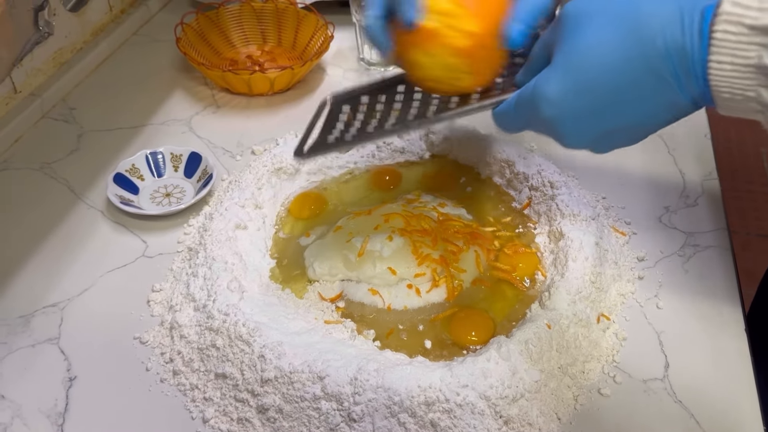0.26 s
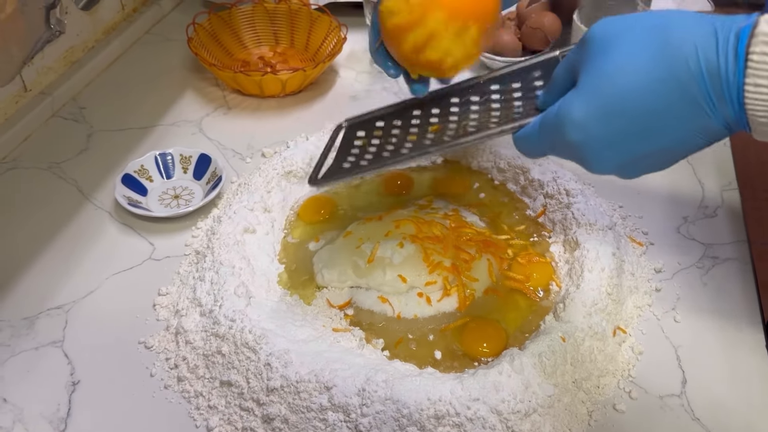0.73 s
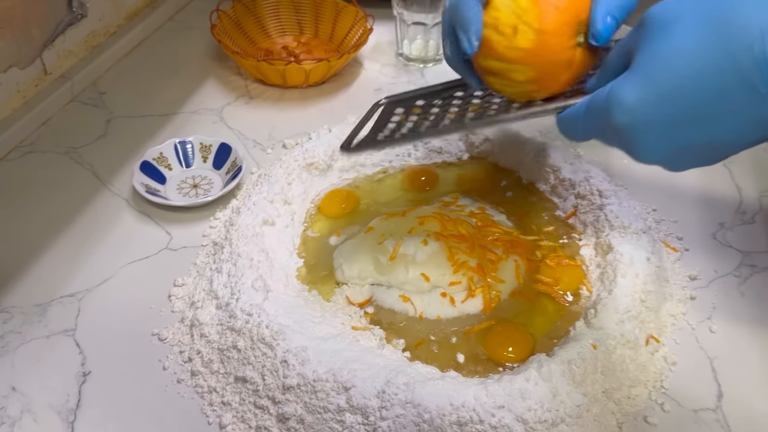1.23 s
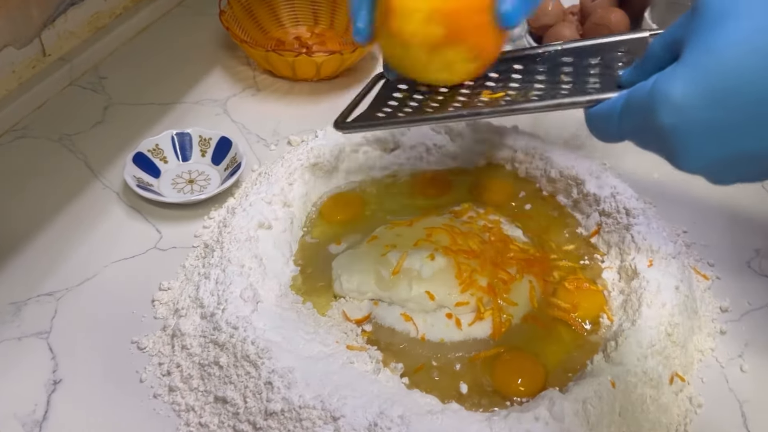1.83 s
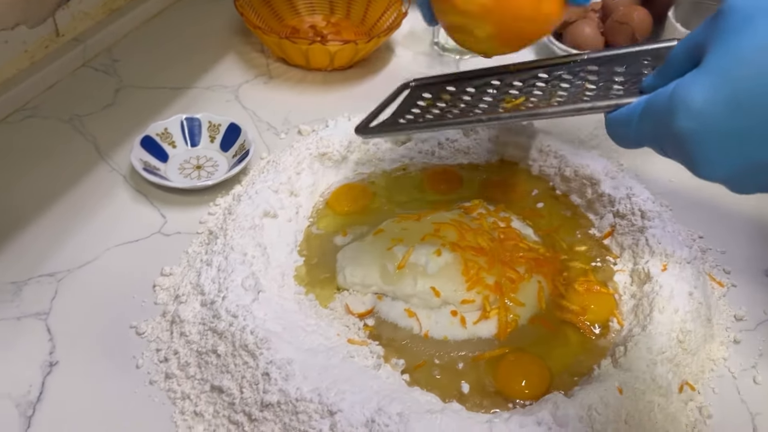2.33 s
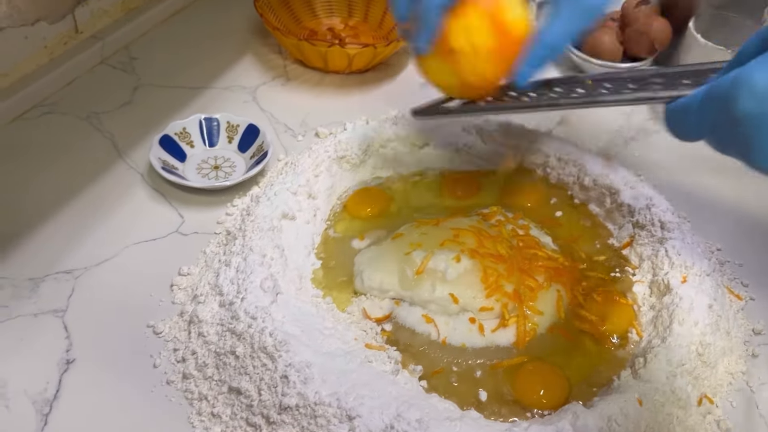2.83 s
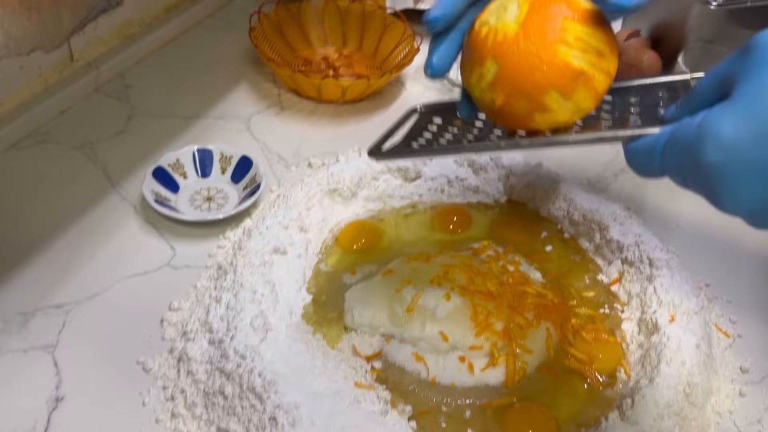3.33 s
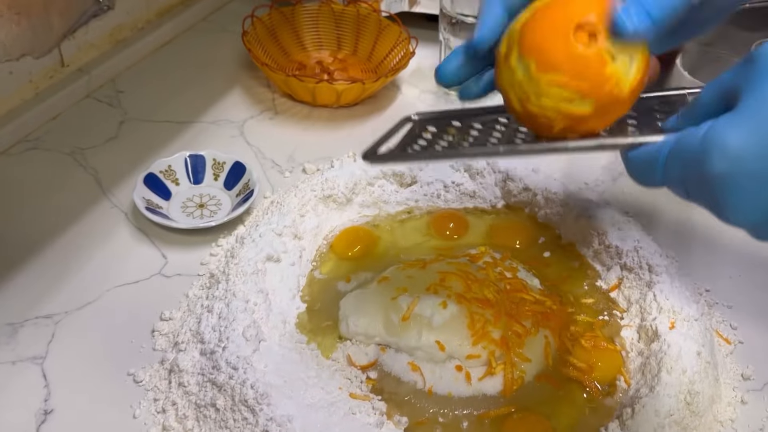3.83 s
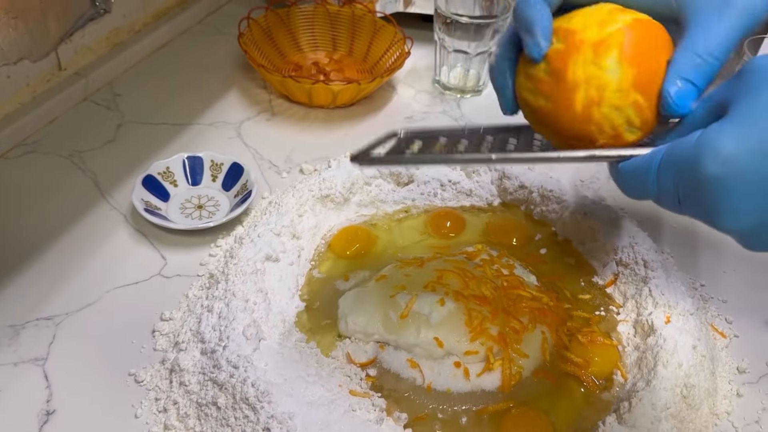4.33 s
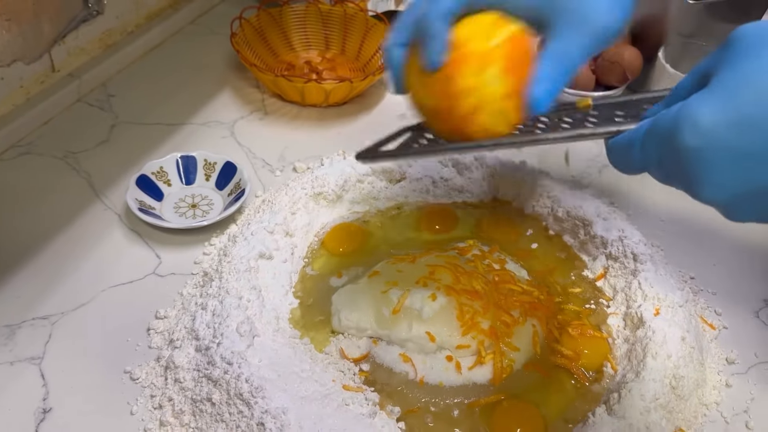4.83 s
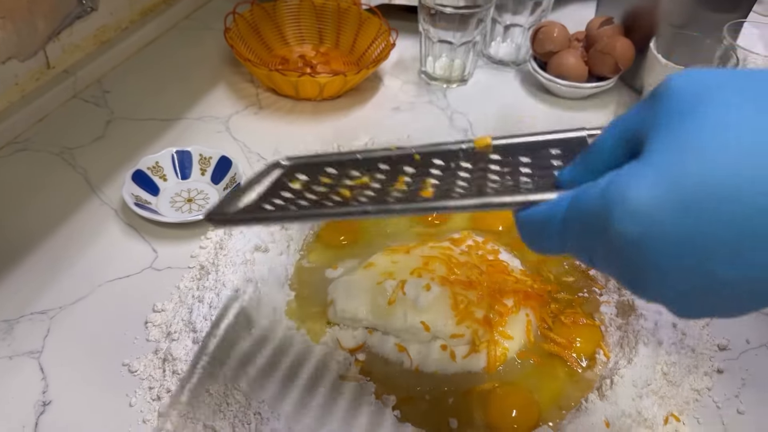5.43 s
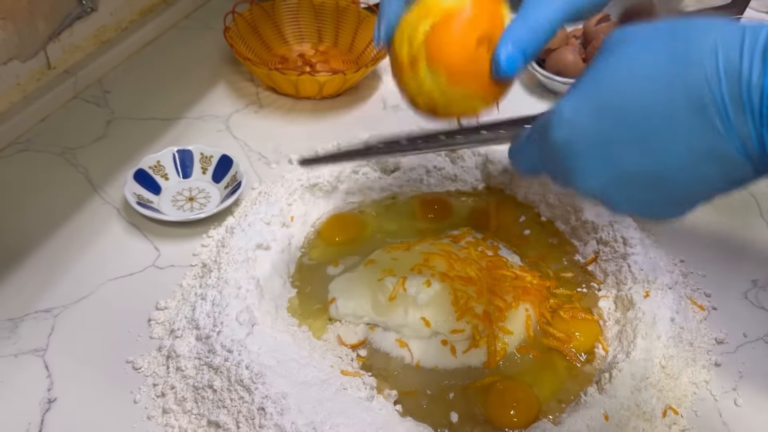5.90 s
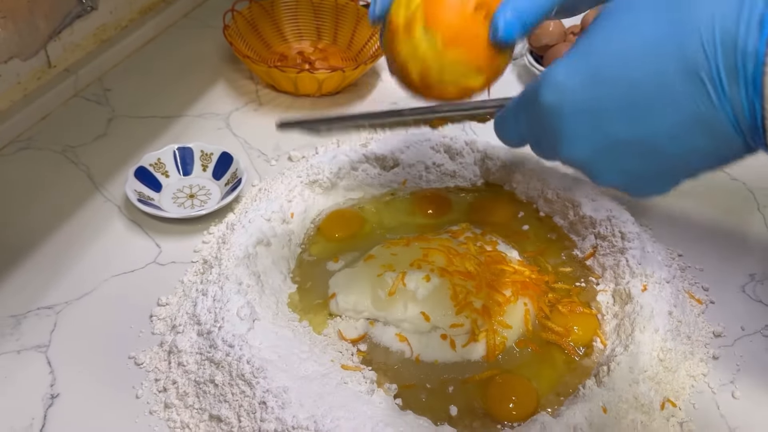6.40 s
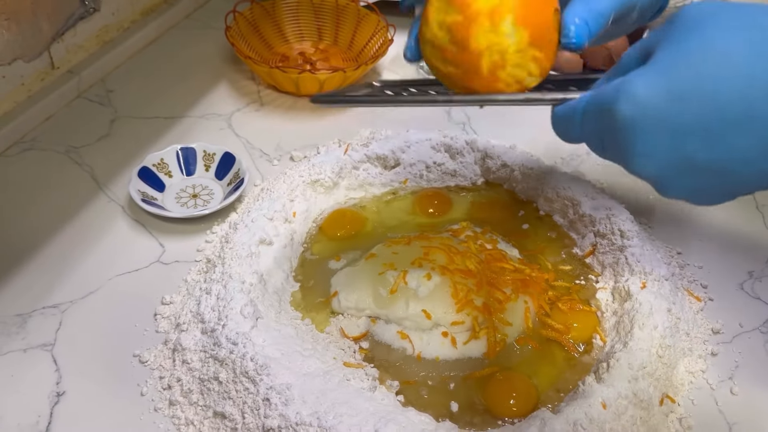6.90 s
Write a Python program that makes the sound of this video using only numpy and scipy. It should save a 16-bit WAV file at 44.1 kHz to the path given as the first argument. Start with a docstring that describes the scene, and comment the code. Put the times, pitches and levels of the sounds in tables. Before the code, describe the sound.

Close up in a small kitchen, an orange is rubbed over a flat steel grater in short, uneven, gritty rasps that ring the plate. Thin ticks and faint slides fill the gaps. Later three hard knocks rattle the grater to shake off zest. A steady low appliance hum with soft hiss runs throughout, and the handheld phone adds dull, low bumps.

```python
"""Zesting an orange

Short rasps of peel on a flat steel grater, close to a phone in a small kitchen: noisy bursts ring the plate.
Light touches and slides tick thinly between them; at the end three knocks shake the zest off the plate.
An appliance hums underneath as steady tones over rumble and hiss.
The hand holding the phone makes dull bumps: short low tones with a scuff of noise."""
import sys
import numpy as np
from scipy import signal
from scipy.fft import rfft, irfft, next_fast_len
from scipy.io import wavfile
from scipy.ndimage import uniform_filter1d, map_coordinates

SR = 44100
rng = np.random.default_rng(int(sys.argv[2]) if len(sys.argv) > 2 else 0)


def master_out(mix):
    """Clip the mix to full scale and print it as 16-bit PCM to the path in sys.argv[1]."""
    frames = np.transpose(np.atleast_2d(mix))
    ceiling = np.clip(frames, -1, 1)
    pcm = np.round(ceiling * 32767).astype(np.int16)
    wavfile.write(sys.argv[1], SR, pcm)


N = 315491  # length in samples


def amp(db):
    """Turn decibels into a gain."""
    return 10 ** (np.asarray(db) / 20)


def unit(x):
    """Scale x to rms 1."""
    return x / np.sqrt(np.mean(x ** 2) + 1e-20)


def along(points, hz):
    """Read a curve of (pitch_hz, value) points on a log pitch axis."""
    point_hz, values = np.transpose(points)
    return np.interp(np.log(hz + 1), np.log(point_hz + 1), values)


def wobble(rate):
    """Draw a smooth random curve with rate knots a second."""
    knots = rng.standard_normal(int(N * rate / SR) + 4)
    return map_coordinates(knots, [np.arange(N) * rate / SR])


def filtered(x, response):
    """Filter x by a response, which may be complex, given as a function of frequency."""
    size = next_fast_len(N + SR // 2)  # spare room for ringing
    hz = np.fft.rfftfreq(size, 1 / SR)
    return irfft(rfft(x, size) * response(hz), size)[..., :N]


def tilt(x, corner_hz):
    """Split x into what lies below and above a corner."""
    low = filtered(x, lambda hz: 1 / (1 + (hz / corner_hz) ** 8))
    return low, x - low


def band(x, centre_hz, width_hz):
    """Keep the part of x around a centre frequency."""
    return filtered(x, lambda hz: 1 / (1 + ((hz - centre_hz) / (width_hz / 2)) ** 4))


def causal(gain):
    """Give this gain its minimum-phase response, which rings only after a blow."""
    cepstrum = irfft(np.log(np.maximum(gain, 1e-6)))
    half = len(cepstrum) // 2
    folded = np.r_[cepstrum[0], 2 * cepstrum[1:half], np.zeros(half)]
    return np.exp(rfft(folded))


def spread(pair, alike):
    """Mix two unrelated signals into a left and right of the given likeness."""
    def mid_and_side(hz):
        turn = np.arccos(np.clip(along(alike, hz), -1, 1)) / 2
        return np.array([np.cos(turn), np.sin(turn)])
    mid, side = filtered(pair, mid_and_side)
    return np.array([mid + side, mid - side])


def blow(start_s, t60, attack):
    """Shape a blow: a quick rise (attack, s), then a decay of 60 dB in t60 seconds."""
    out = np.zeros(N + SR)
    first = max(round(start_s * SR), 0)
    t = np.arange(SR // 2) / SR
    decay = np.exp(-np.log(1000) * t / t60)
    out[first:first + len(t)] = decay * (1 - np.exp(-t / attack))
    return out[:N]


def snaps(rate, scatter_db):
    """Make two streams of tiny ruptures of uneven size, about rate a second, rms 1."""
    hit = rng.random((2, N)) < rate / SR
    size = amp(scatter_db * rng.standard_normal((2, N)))
    return unit(hit * rng.choice([-1, 1], (2, N)) * size)


# colour of the kitchen air's noise: pitch_hz, level_db (relative, per Hz)
ROOM_COLOUR = [(20, -30), (42, -7.5), (75, 0), (130, -2), (220, -9.5), (400, -16.5), (700, -19),
               (1300, -26.5), (2000, -32), (3500, -43), (8000, -47.5), (10000, -47), (11700, -64),
               (15300, -52.5)]
# how alike the air noise is at left and right: pitch_hz, coherence (1 = same), before the phone
ROOM_ALIKE = [(70, 1), (140, 0.97), (300, 0.47), (600, 0.33), (1300, 0.037), (3500, 0.22), (7500, 0.47)]
# the appliance's steady tones: pitch_hz, level_db (rms, before the phone)
HUM = [(63, -51), (71.3, -43.5), (100, -34.5), (113, -46), (292, -69.5), (1707, -72), (1755, -66.5),
       (1852, -63), (3558, -75), (4683, -82), (5410, -76)]


def kitchen():
    """The appliance's hum and faint whine over an uneven rumble and a smooth hiss."""
    t = np.arange(N) / SR
    noise = spread(rng.standard_normal((2, N)), ROOM_ALIKE)
    air = unit(filtered(noise, lambda hz: amp(along(ROOM_COLOUR, hz))))
    rumble, hiss = tilt(air, corner_hz=295)
    tones = np.zeros(N)
    for pitch_hz, level_db in HUM:
        wandering_t = t + 0.00013 * wobble(7)  # pitch is not quite steady
        turns = pitch_hz * wandering_t + rng.random()
        tones += amp(level_db) * np.sqrt(2) * np.sin(2 * np.pi * turns)
    return amp(-33.5 + 2.2 * wobble(25)) * rumble + amp(-33.0) * hiss + tones


# the strongest dull bumps of the hand on the phone: start_s, level_db (before the mix below), pitch_hz
BUMPS = [(.516, -24, 193), (.558, -19, 136), (1.363, -20, 161), (1.455, -22, 199), (1.664, -19, 124),
         (1.82, -22.5, 147), (1.94, -22.5, 203), (2.269, -24.5, 198), (2.858, -18.5, 163),
         (2.921, -24.5, 214.5), (3.225, -24, 159), (3.384, -25, 144), (4.7, -20.5, 121), (5.045, -19, 197),
         (5.118, -21, 205), (5.682, -24.5, 207), (6.136, -17, 172), (6.349, -18.5, 203),
         (6.992, -24.5, 178)]
# colour of the hand's scuffing: pitch_hz, level_db (relative, per Hz)
SCUFF_COLOUR = [(60, -39), (130, -0.5), (220, 1), (340, -9), (520, -22), (900, -73)]
BUMP_T60_S = 0.094
# lighter bumps at random times, one in each equal slice of the scene
NUDGE_COUNT, NUDGE_DB, NUDGE_LOW_HZ, NUDGE_HIGH_HZ = 10, -28, 117, 215


def bumping():
    """The phone's body answers each shift of the hand with a few low cycles and a scuff; the grip fidgets."""
    t = np.arange(N) / SR
    bumps = list(BUMPS)
    for slot, (when, height) in enumerate(rng.random((NUDGE_COUNT, 2))):
        start_s = (slot + when) * N / SR / NUDGE_COUNT
        pitch_hz = NUDGE_LOW_HZ + height * (NUDGE_HIGH_HZ - NUDGE_LOW_HZ)
        bumps.append((start_s, NUDGE_DB, pitch_hz))
    pushes, thumps = np.zeros(N), np.zeros(N)
    for start_s, level_db, pitch_hz in bumps:
        push = amp(level_db) * blow(start_s, BUMP_T60_S, attack=0.0033)
        pushes += push
        thumps += push * np.sin(2 * np.pi * pitch_hz * (t - start_s))
    scuff = unit(filtered(rng.standard_normal(N), lambda hz: amp(along(SCUFF_COLOUR, hz))))
    fidget = amp(-44.5) * unit(amp(6.3 * wobble(35)))
    return amp(3.5) * thumps + scuff * (amp(-7.5) * pushes + fidget)


# how long the room's echo takes to die by 60 dB: pitch_hz, t60_s
WALLS = [(200, 0.23), (2000, 0.22), (7000, 0.18), (15000, 0.14)]


def walls(x):
    """The room's short answer: decaying noise that dies faster in the treble."""
    noise = rng.standard_normal((2, SR // 2))
    hz, t, z = signal.stft(noise, SR, nperseg=256)
    decay = np.exp(-np.log(1000) * t / along(WALLS, hz)[:, None])
    tail = signal.istft(z * decay, SR, nperseg=256)[1]
    tail = np.pad(tail / np.linalg.norm(tail[0]), ((0, 0), (SR // 200, 0)))  # starts 5 ms late
    return signal.fftconvolve(x, tail, axes=1)[:, :N]


# resonances of the grater plate: pitch_hz, width_hz, rubbed_db, knocked_db (both relative)
PLATE = [(614, 69, 3.5, 7.5), (942, 30, 7.5, 11), (1247, 59, 3, 3), (1497, 36, 2, -9), (1898, 54, 4, -5),
         (2196, 64, 4.5, 2.5), (2970, 34, -13, 3), (3150, 37, 1, -4), (3690, 70, -1.5, -6),
         (4530, 80, -1, -4), (5270, 31, -19, 4), (5670, 45, -14, -3), (7040, 110, -2.5, 1.5)]
# how alike the grater is at left and right: pitch_hz, coherence (1 = same), before the phone
GRATER_ALIKE = [(300, 0.98), (700, 0.62), (1700, 0.25), (3500, 0.69), (5500, 0.41), (7200, 0.73)]
RUBBED, KNOCKED = 2, 3  # level columns of PLATE


def plate(force, spectrum, ring, column):
    """A force on the grater, heard through its broad colour and its narrow resonances."""
    def response(hz):
        modes = np.zeros(len(hz))
        for mode in PLATE:
            detuning = 2 * (hz - mode[0]) / mode[1]
            modes += amp(mode[column]) ** 2 / (1 + detuning ** 2)
        return causal(unit(amp(along(spectrum, hz)) * np.sqrt(1 + ring ** 2 * modes)))
    return spread(filtered(force, response), GRATER_ALIKE)


# knocks on the grater: start_s, level_db (before the plate), rebound_after_s, rebound_db (relative)
KNOCKS = [(5.8166, -28.5, 0.0041, -9.5), (6.075, -30, 0.0063, -8.5), (6.3202, -25.5, 0.009, -13)]
# broad colour of a knock: pitch_hz, level_db (relative, per Hz)
KNOCK_COLOUR = [(150, -13), (600, -7), (850, -11.5), (1350, -2), (2400, -11), (3100, -12), (4100, -13),
                (5500, -13.5), (7000, -8), (8500, -15.5), (10000, -14.5), (12200, -26), (15000, -21.5)]


def knocking():
    """Each knock starts with a hard crack and rattles the hand-damped plate, with a quick rebound."""
    force = np.zeros(N)
    for start_s, level_db, rebound_after_s, rebound_db in KNOCKS:
        crack = amp(1.5) * blow(start_s, t60=0.016, attack=0.00048)
        rattle = blow(start_s, t60=0.051, attack=0.0009)
        rebound = amp(rebound_db) * blow(start_s + rebound_after_s, t60=0.069, attack=0.00056)
        force += amp(level_db) * (crack + rattle + rebound)
    return amp(2.5) * plate(force * rng.standard_normal((2, N)), KNOCK_COLOUR, ring=1.0, column=KNOCKED)


# a firm touch damps itself sooner: its t60, its level, and the drop in level that doubles t60
TOUCH_T60_S, FIRM_DB, DOUBLING_DB = 0.079, -37, 22


def touch(start_s, level_db):
    """Envelope of the peel meeting the teeth; light touches linger."""
    t60_s = TOUCH_T60_S * 2 ** ((FIRM_DB - level_db) / DOUBLING_DB)
    return amp(level_db) * blow(start_s, t60_s, attack=0.00038)


# cutting strokes, also played by grating(): start_s, bite_s, drag_s, level_db (before the plate),
# flex_db (relative, before a common cut), scrape_db (relative)
STROKES = [(-.012, .016, 0.057, -34, 4, -1), (.318, 0.065, 0.046, -36, 5, -1),
           (1.248, 0.031, 0.065, -34.5, 2.5, -1.5), (1.58, 0.05, .048, -33.5, 4, 2.5),
           (2.717, 0.042, 0.053, -37, 1.5, 0.5), (4.39, 0.041, 0.064, -36, -1.5, 2),
           (4.76, 0.029, 0.064, -37.5, 0, 2.5), (5.085, .028, 0.011, -37.5, 1, 1)]
# the peel touches the teeth: start_s, level_db (before the plate)
TOUCHES = [(.243, -55), (.323, -46), (1.214, -47.5), (1.364, -40.5), (1.545, -55), (1.58, -38),
           (3.037, -50), (3.527, -42.5), (3.546, -52), (3.999, -53.5), (4.345, -45.5), (4.361, -43),
           (4.405, -38), (4.661, -49), (4.741, -39), (4.756, -47), (5.027, -54), (5.086, -46)]
# the peel slides lightly without cutting: middle_s, half_length_s, level_db (before the plate)
GLIDES = [(3.0, 0.18, -59.5), (3.804, .08, -59)]
# the sliding peel's faint squeak: pitch_hz, width_hz, gain_db (on that band of the slide)
GLIDE_SQUEAK = (4320, 270, 2.6)
# broad colour of rubbing, also used by grating(): pitch_hz, level_db (relative, per Hz)
RASP_COLOUR = [(200, -13), (550, -6.5), (1000, -8), (1450, -1), (2000, -3.5), (2700, -6), (4200, -8.5),
               (5600, -13.5), (7200, -9.5), (9600, -6), (12000, -14), (14200, -7.5), (15300, -13)]
# the peel snags just before the deepest bite, at a level relative to its stroke
SNAG_LEAD_S, SNAG_DB = 0.0044, -10
GLIDE_FADE_DB = 9  # drop at half length from the middle


def brushing():
    """Touches, snags and glides only tick the tips of the teeth, so they sound thin."""
    t = np.arange(N) / SR
    meetings = list(TOUCHES)
    for start_s, bite_s, _, level_db, *_ in STROKES:
        meetings.append((start_s + bite_s - SNAG_LEAD_S, level_db + SNAG_DB))
    touches = snaps(rate=4000, scatter_db=3.5) * sum(touch(s, db) for s, db in meetings)
    sliding = np.zeros(N)
    for middle_s, half_s, level_db in GLIDES:
        sliding += amp(level_db - GLIDE_FADE_DB * ((t - middle_s) / half_s) ** 2)
    glides = snaps(rate=3000, scatter_db=0) * sliding
    squeak_hz, width_hz, squeak_db = GLIDE_SQUEAK
    squeak = amp(squeak_db) * band(glides, squeak_hz, width_hz)
    flex, rasp = tilt(touches + glides + squeak, corner_hz=2350)
    return plate(amp(7) * rasp + amp(-2) * flex, RASP_COLOUR, ring=2.3, column=RUBBED)


# a stroke swells as the teeth bite in, sags while the peel drags, and dies as the fruit lifts
CONTACT_S, BITE_DB, SAG_DB_PER_S, LIFT_DB_PER_S = .002, 15.5, 83, 460


def stroke(start_s, bite_s, drag_s):
    """Envelope of one stroke, top 1: bite in, drag, lift off."""
    t = np.arange(N) / SR - start_s
    swell_db = BITE_DB * np.minimum(t / bite_s - 1, 0)
    sag_db = SAG_DB_PER_S * np.clip(t - bite_s, 0, drag_s)
    lift_db = LIFT_DB_PER_S * np.maximum(t - bite_s - drag_s, 0)
    return amp(swell_db - sag_db - lift_db) * np.clip(t / CONTACT_S, 0, 1)


def shifting(x, depth_db):
    """The fruit damps the plate at a moving spot, so narrow bands of sound come and go."""
    z = signal.stft(x, nperseg=1024)[2]
    field = rng.standard_normal(z.shape[1:])
    field = uniform_filter1d(field, size=3, axis=0)  # smooth over pitch
    field = uniform_filter1d(field, size=5, axis=1)  # smooth over time
    gain = unit(amp(depth_db * unit(field)))
    return signal.istft(z * gain, nperseg=1024)[1][:, :N]


def grating():
    """Teeth burst the peel's cells in dense clumps; at the height of a stroke the plate flexes most."""
    # rows of teeth, and single teeth, catch and let go
    catching = unit(amp(1.0 * wobble(90) + 0.94 * wobble(320)))
    ruptures = snaps(rate=4000, scatter_db=3)
    tearing = unit(ruptures + .5 * rng.standard_normal((2, N))) * catching
    flex = band(tearing, centre_hz=1800, width_hz=1500)
    scrape = band(tearing, centre_hz=4550, width_hz=900)
    force = np.zeros((2, N))
    for start_s, bite_s, drag_s, level_db, flex_db, scrape_db in STROKES:
        push = stroke(start_s, bite_s, drag_s)
        bending = amp(flex_db - 2.5) * push ** 0.16
        colour = tearing + (bending - 1) * flex + (amp(scrape_db) - 1) * scrape
        force += amp(level_db) * push * colour
    return amp(7.0) * plate(shifting(force, depth_db=2.5), RASP_COLOUR, ring=1.28, column=RUBBED)


def scene():
    """The grater and its echo in the humming kitchen, with the hand's bumps on the phone."""
    grater = grating() + brushing() + knocking()
    return grater + amp(-9.5) * walls(grater) + kitchen() + bumping()


# phase by which the phone's left channel leads the right: pitch_hz, lead_half_turns
PORTS = [(0, 0), (2200, -.08), (3000, -.33), (4500, -.12), (7700, -.03), (8100, -1), (9400, -1), (10700, 0),
         (11800, 0), (12700, 1), (13600, 1), (15000, 2)]
MONO_ABOVE_HZ, TOP_HZ = 8000, 15800  # treble mostly shared above the first, nothing from the second up


def record(dry):
    """The phone favours the right in the mids, shares most treble between channels and turns their phase."""
    shared = filtered(dry[0] - dry, lambda hz: hz >= MONO_ABOVE_HZ)
    pair = dry + .9 * shared  # right's treble moves most of the way to left's
    sides = np.array([[.5], [-.5]])  # left, right

    def ports(hz):
        # left level over right, in dB
        lean_db = along([(150, 0.63), (300, -1.05), (7800, -2.0), (8300, -0.74)], hz)
        lead = np.interp(hz, *np.transpose(PORTS))
        return amp(sides * lean_db) * np.exp(1j * np.pi * sides * lead) * (hz < TOP_HZ)
    return filtered(pair, ports)


dry = scene()
out = record(dry)
master_out(out)
```